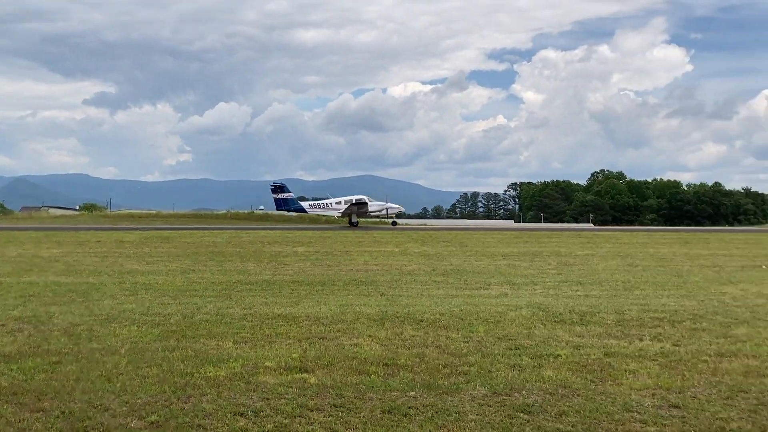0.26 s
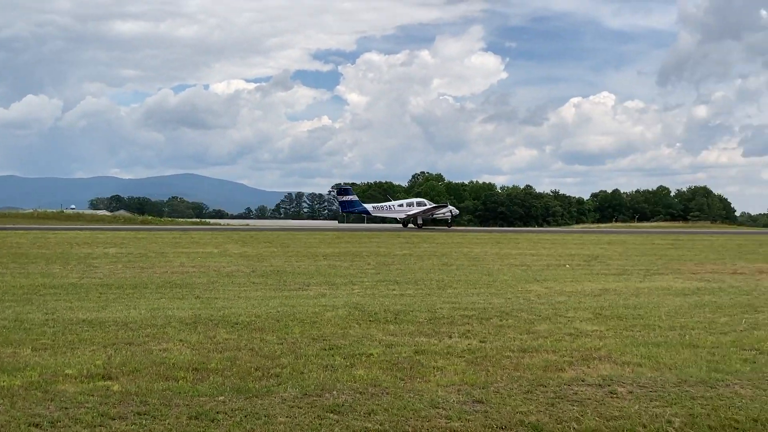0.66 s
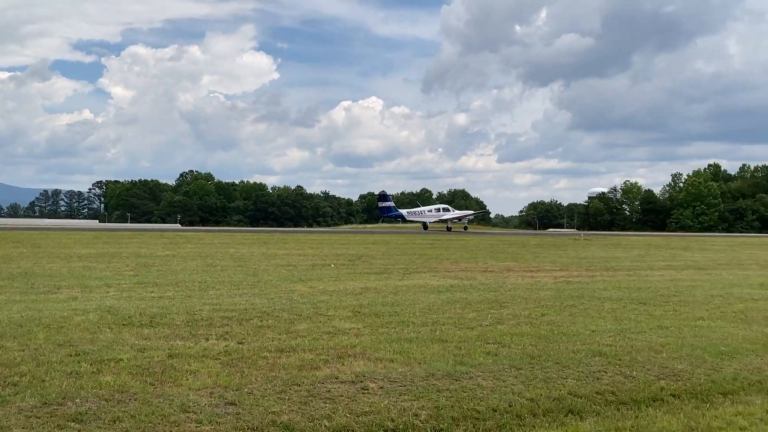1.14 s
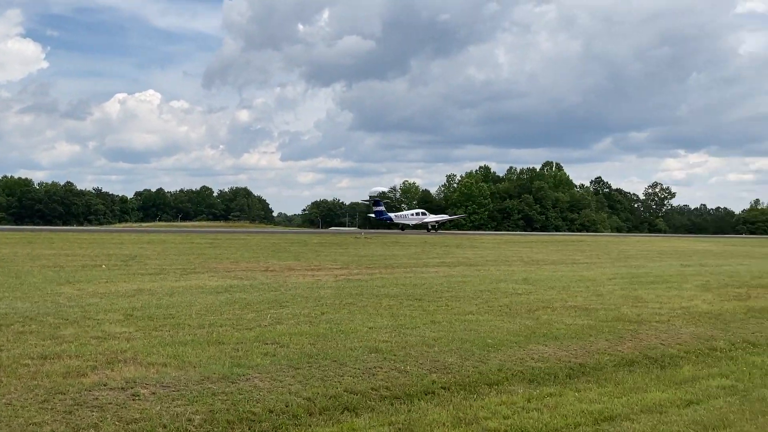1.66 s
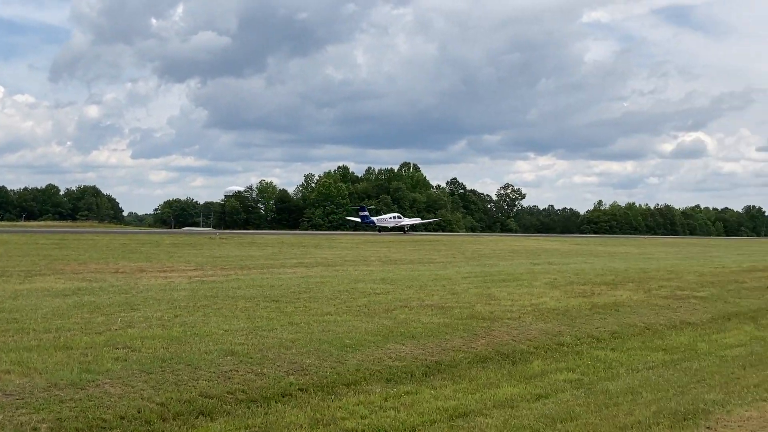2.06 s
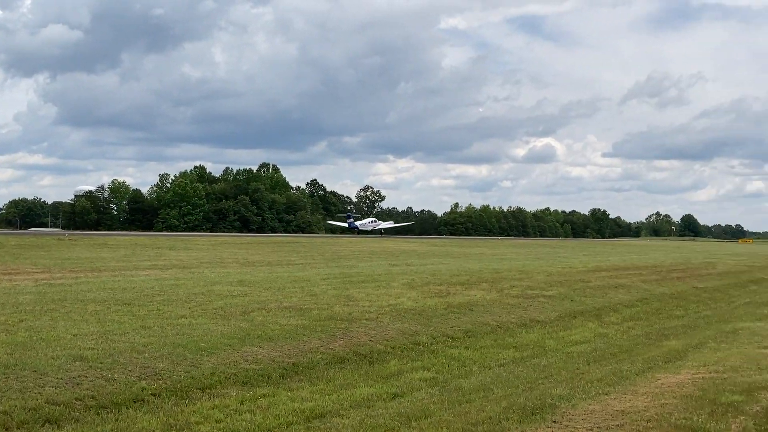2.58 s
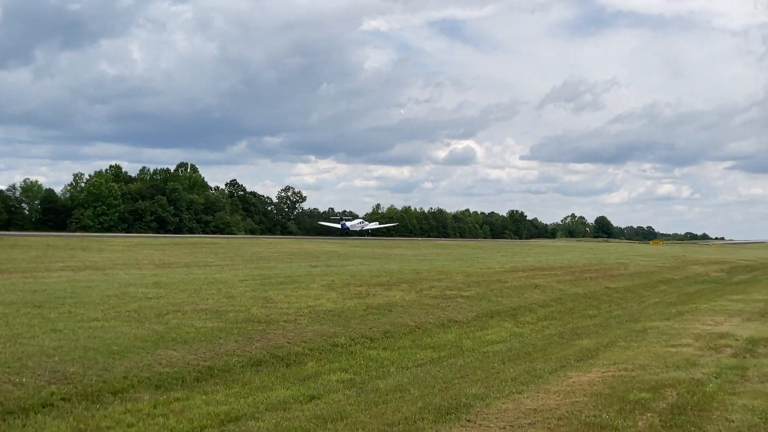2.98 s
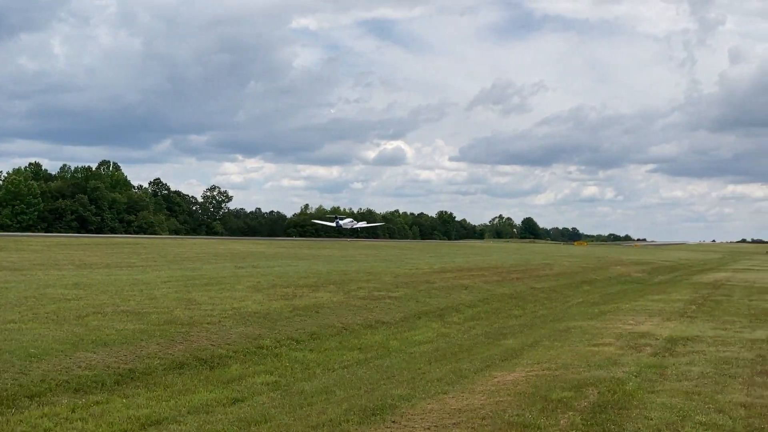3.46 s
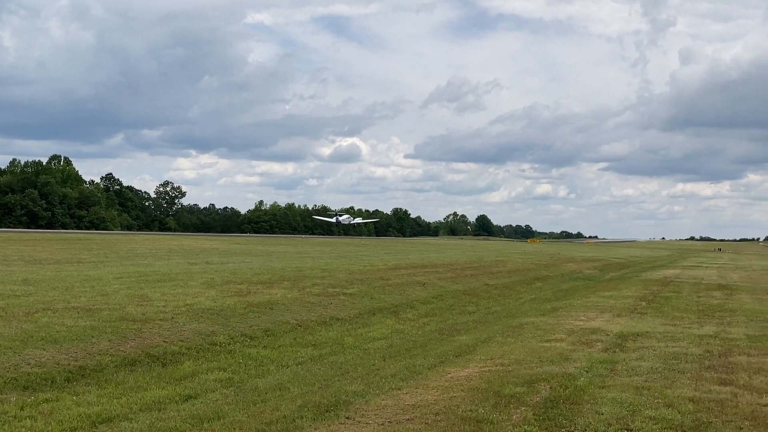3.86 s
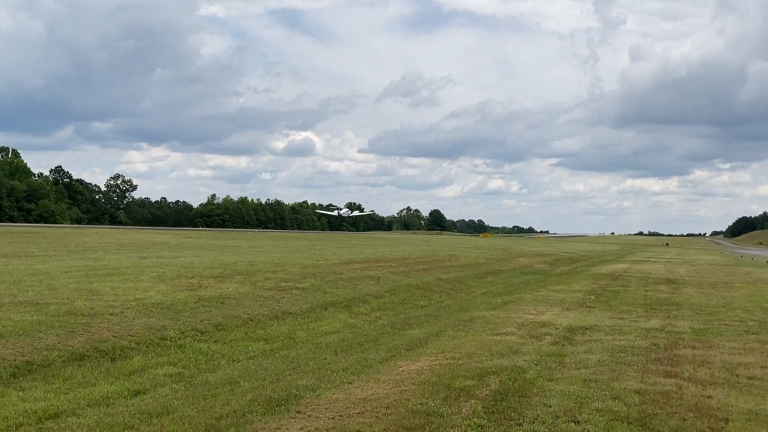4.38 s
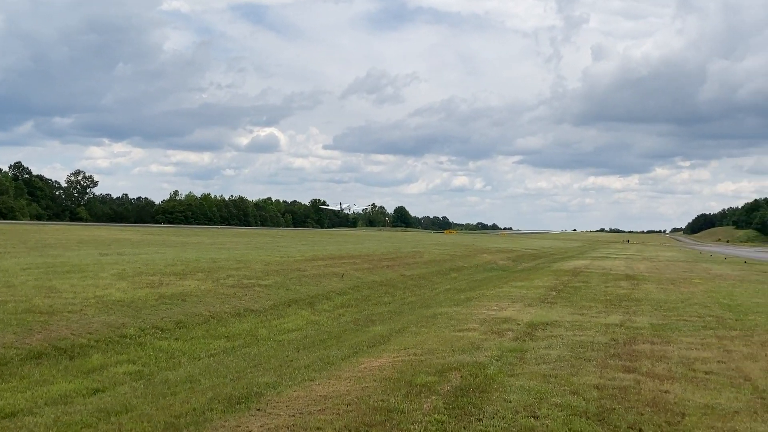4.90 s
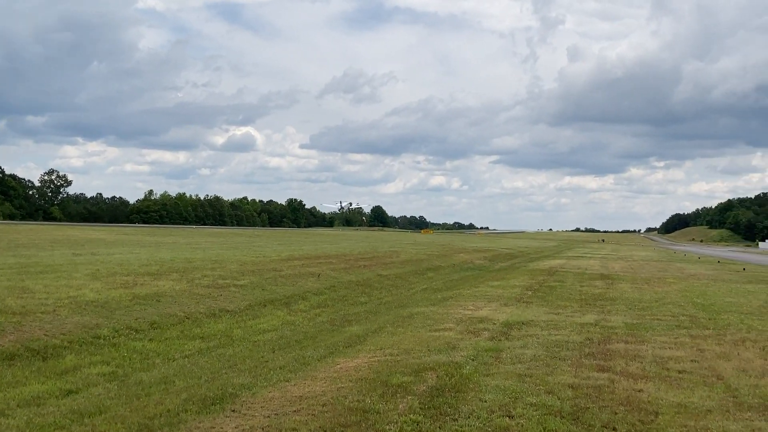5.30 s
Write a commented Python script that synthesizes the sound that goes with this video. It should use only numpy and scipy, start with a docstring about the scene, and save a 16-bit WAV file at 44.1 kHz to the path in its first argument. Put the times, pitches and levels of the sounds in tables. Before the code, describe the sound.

A twin-engine propeller plane roars past at full power, raspy and throbbing, then quickly fades to a distant low drone over open grass.

```python
"""Departure of a twin-engine propeller plane

At full power it passes along a runway, lifts off and recedes over open grass; its drone slides down in pitch.
The drone is a harmonic series on the blade rate, in which two propellers slip through each other.
Each exhaust firing gates a rasp of noise that the air dulls with distance, over a low turbulent rumble.
A faint outdoor wash and one soft swell lie behind, with two very short, faint pulses of high treble.
Two close microphone ports hear the sound with a phase lead.
"""
import sys
import numpy as np
from scipy import signal
from scipy.fft import rfft, irfft, next_fast_len
from scipy.io import wavfile
from scipy.ndimage import uniform_filter1d

SR = 44100
rng = np.random.default_rng(int(sys.argv[2]) if len(sys.argv) > 2 else 0)


def wav_record(signal):
    """Record a signal, one row per channel, as 16-bit PCM in the file named by sys.argv[1]."""
    frames = np.transpose(np.atleast_2d(signal))
    bounded = np.clip(frames, -1, 1)
    # unit amplitude maps onto the largest positive 16-bit level
    quanta = np.round(bounded * 32767).astype(np.int16)
    wavfile.write(sys.argv[1], SR, quanta)


N = 244314  # samples

# Microphone ports: hz, left_lead_rad, likeness_0_to_1, left_minus_right_db
PORTS = [(59.8, -0.7, 1, -1.5), (198.5, -1.13, 0.96, 2.5), (700, 1, 0.86, -0.5), (1030, 0.65, 1, 2.5),
         (1440, 0.47, 0.92, 1.5), (1845, 0.5, 1, 1.5), (2800, 0.93, 1, 3), (3050, 0.9, 0.92, -2),
         (3380, 1.67, 0.6, 1), (3820, 0.4, 0.77, -1), (4420, 1.08, 0.35, -0.5), (5540, 2.5, 0.7, -3.5),
         (6090, 1.5, 0.9, -1.5), (6710, 0.54, 1, -0.5)]
# Above that table the two channels turn half a cycle further apart each step, losing likeness between
STEP_HZ, STEP_BLUR = 2120, .12
EDGE_HZ = 15850  # upper band limit

# Outdoor wash colour: hz, density_db
WASH_COLOUR = [(200, -16), (330, -26), (600, 1.5), (1150, -4.5), (1800, -2.5), (2700, -6), (4330, -11),
               (7320, -16.5), (8500, -18), (12000, -58.5)]
WASH_DB, WASH_PATCHY_DB = -51, 2.1
# Extra level of the wash below 1 kHz: time_s, level_db
WASH_LOW_DB = [(0, 3), (2.5, 5), (3.2, 2.5), (3.7, -3), (4.12, 1.5), (4.3, 7.5), (4.45, 1.5), (4.8, 0),
               (5.54, -6)]
# Bumps and dips in the rasp and wash: centre_s, half_length_s, centre_hz, half_width_hz, change_db
DRIFTS = [(.4, 0.15, 2440, 148, 5), (0.902, 0.47, 1570, 130, -6), (1, 0.085, 3100, 150, 3.5),
          (1.101, 0.94, 2440, 201, 3), (1.205, 0.16, 3250, 800, 0.5), (.5, .5, 970, 70, -11),
          (1.298, 0.22, 3860, 149.6, 6), (1.897, 0.051, 1880, 180, 5), (2.052, .06, 1770, 180, 10),
          (2.105, 0.081, 1050, 100, 12), (2.205, 0.14, 2500, 350, -0.5), (2.498, 0.18, 1050, 100.1, 8.5),
          (2.55, 0.27, 700, 120, 4), (.5, .6, 400, 200, -1.5), (2.9, .3, 1150, 150, -2.5),
          (5.3, .3, 500, 200, 4.5), (3.298, 0.35, 550, 100, 3), (1.898, 0.069, 3500, 900, 5.5),
          (3.303, .35, 1150, 120, 4), (3.7, 0.31, 2700, 150, 3.5), (3.697, 0.23, 2050, 150.3, 2),
          (4.005, .3, 3540, 200, 8), (4.099, 0.24, 2320, 149.4, 6), (4.601, 0.18, 1250, 120, 8),
          (4.9, 0.37, 802.6, 150.2, -1.5), (5, .15, 2890, 110.2, -1), (5.2, 0.37, 2260, 251, -3.5),
          (5.402, 0.12, 1720, 149.8, 4.5)]
SWELL_S, SWELL_HALF_S, SWELL_HZ, SWELL_OCTAVES, SWELL_DB = 4.27, 0.63, 1050, 1, -50.5
# Damped pulses of high treble: start_s, level_db
TREBLE_PULSES = [(3.4229, -40), (3.816, -50)]

# Rumble colour: hz, density_db
RUMBLE_COLOUR = [(25, -1), (50, 8.5), (110, 11.5), (200, 14.5), (300, -2), (600, -9.5), (1000, -47.5)]
# Rumble level: time_s, level_db
RUMBLE_DB = [(0, -34), (.6, -41.5), (1.2, -38.5), (2, -45.5), (2.8, -42), (3.5, -44), (4.5, -44),
             (5.54, -51)]

# Uneven firings between the orders: blade_rate_multiple, peak_db, peak_s, loss_db_per_s away from the peak
BETWEEN = [(1.25, -50.5, 2.1, 1), (1.5, -49.5, 0.5, 2), (1.75, -45.5, 2, 4.5), (2.5, -45.5, 2, 9),
           (2.75, -49.5, 0.46, 10), (3.25, -54, 2.3, 9)]
WAVER_DB, WAVER_S = 1.5, 0.15

# Exhaust rasp, whose surges are louder and brighter: time_s, level_db, brightness_db
RASP = [(0, -19, -7), (.1, -20, -7), (.21, -19, -1.5), (.42, -22.5, 1.5), (.66, -19.5, 1.5), (.77, -22, -4),
        (.99, -19, -1.5), (1.15, -22, 2), (1.32, -24, -0.5), (1.48, -27, 6.5), (1.6, -27.5, 1),
        (1.75, -31.5, 5), (1.83, -34, 0), (1.9, -32.5, 4), (1.98, -33, 6.5), (2.03, -34.5, -0.5),
        (2.18, -39, -5), (2.25, -38, 4.5), (2.33, -38.5, 1), (2.84, -42.5, -3.5), (3.24, -51.5, -6),
        (4.3, -54, -3.5), (5.54, -55.5, 8)]
# Rasp colour: hz, density_db
RASP_COLOUR = [(200, -32), (330, -12), (500, -7.5), (750, -3.5), (880, -9.5), (970, -12), (1070, 3.5),
               (1150, 2.5), (1350, 1.5), (1600, -1.5), (1900, -0.5), (2250, -5), (2900, -1), (3500, -1),
               (5400, 0.5), (7500, 0), (9100, 1), (10100, -5), (16000, -22.5)]
# Rasp tone: time_s, growl_db (below 2.2 kHz), ring_db (near 1.85 kHz), throbbing_share_0_to_1
RASP_TONE = [(0, -8, -0.5, 0.59), (.3, -0.5, 3, 0.58), (.5, -1, 5.5, 0.41), (.75, -5.5, 1.5, 0.61),
             (1, -8.5, 1, 0.75), (1.3, -4, 4.5, 0.63), (1.5, -5, 7, 0.74), (1.8, -1.5, 1.5, 0.61),
             (1.93, -3, 3, 0.67), (2.05, -3, -1, 0.38), (2.3, -1, 1, 0.54), (2.7, -1.5, 1, 0.44),
             (3.2, -4.5, 1, 0.32), (4.4, -7.5, 0, 0.65), (5.2, -7.5, -9, 0.46), (5.54, 6, 4, 0.58)]
# Rasp bands: upper_edge_hz, throb_factor, part_in_hard_firings_0_to_1
RASP_BANDS = [(1520, 0.45, .2), (3500, 1.04, 0.8), (7200, 1.18, .9), (16500, 1.1, 1)]
CRACKLE_DB, TREBLE_DB, TREBLE_FOLLOWS = -7.5, -11, 0.36  # near 4 kHz; above 6 kHz; share of brightness
RASP_PATCHY_DB = .9
# Air loss at 12 kHz: time_s, loss_db
AIR_DB = [(0, -6), (1, -0.5), (2, 2.5), (3, 2), (4, 13), (5.54, 26)]
# Burst size of the four exhausts in turn, one of them louder: level_db
CYLINDERS_DB = [1.14, -2.3, -0.14, 0.077]
SIZE_SPREAD_DB = .7  # random spread of burst sizes
# Harder firings: time_s, gain_db before the band's part
HARD_FIRINGS = [(.161, 2), (.297, 5), (.399, 2), (.629, 2), (.674, 1.5), (.85, 2), (.908, 3.5), (.955, 4),
                (.979, 2), (1.003, 2), (1.05, 3), (1.097, 4.5), (1.228, 3), (1.432, 5), (1.882, 2),
                (1.906, 2), (1.955, 2), (1.98, 2), (2.005, 2), (2.856, 2.5)]
# Drift of the bursts against the blade passes as the path changes: time_s, delay_blade_passes
FIRING_DELAY = [(0, .1), (.45, .03), (.75, -.02), (1.05, -.06), (1.65, -.07), (1.95, -.03), (2.25, -.11),
                (2.65, -.22), (2.9, -.16), (3.25, .1), (4.25, .05), (4.75, .35), (5.54, .62)]
RISE, FALL, TAIL, TAIL_SHARE = .105, .125, .27, .45  # burst widths in blade passes; share of the tail
CRACK_DB, CRACK_ORDERS = -27, range(12, 60)  # each order against the rasp, before its colour

# Blade-passing rate as heard, lowered as the plane turns away: time_s, pitch_hz, overtone_left_lead_rad
PITCH = [(0, 89.76, 1.06), (.5, 86.98, 1.06), (1, 84.45, 1.04), (1.5, 82.9, 0.95), (2, 81.6, 0.6),
         (2.4, 80.7, -0.26), (3, 80.57, -0.44), (5.54, 79.47, -0.4)]
# First order, a beating pair: time_s, level_db, partner_gain_turns, partner_ratio
FIRST_ORDER = [(0.0, -11.0, -0.34, 0.13), (0.4, -19.3, 0.34, 0.54), (0.69, -19.2, 0.54, 0.85),
               (0.9, -23.0, 0.82, 0.0), (1.17, -17.3, 1.34, 0.29), (1.47, -18.0, 2.31, 0.24),
               (2.0, -19.1, 4.33, 0.1), (2.3, -17.7, 5.3, 0.14), (2.9, -20.4, 7.35, 0.0),
               (3.2, -23.7, 8.45, 0.17), (3.79, -31.9, 10.41, 1.0), (4.15, -24.4, 11.28, 0.41),
               (4.58, -23.1, 12.6, 0.16), (4.95, -32.0, 13.69, 0.39), (5.25, -30.5, 14.73, 0.12),
               (5.54, -31.3, 15.93, 0.67)]
# Second order, a beating pair: time_s, level_db, partner_gain_turns, partner_ratio
SECOND_ORDER = [(0.0, -20.2, 0.07, 0.36), (0.19, -21.0, 0.38, 0.76), (0.31, -18.5, 0.68, 0.3),
                (0.42, -16, 0.8, 0.1), (0.57, -15.7, 0.98, 0.07), (0.85, -18.6, 1.0, 0.0),
                (0.97, -20, 1.15, 0.05), (1.025, -23, 1.5, 0.55), (1.08, -26, 2, 0.3),
                (1.17, -28, 2.52, 0.6), (1.26, -28, 3.1, 0.05), (1.35, -24.5, 3.6, 0),
                (1.54, -20.7, 4.8, 0.0), (1.98, -26.1, 8.1, 0.18), (2.19, -35.5, 10.1, 0.45),
                (2.55, -27.9, 12.6, 0.0), (3.08, -32.3, 16.72, 0.15), (3.3, -37, 17.9, 0.2),
                (3.41, -36, 18.5, 0.35), (3.6, -34.5, 19.5, 0.25), (3.73, -34.9, 20.41, 0.71),
                (4.11, -34.7, 22.36, 0.88), (4.51, -36.2, 23.67, 0.64), (4.97, -42.5, 25.5, 0.86),
                (5.16, -38.7, 25.6, 0.16), (5.54, -36.4, 27.29, 0.01)]
# Slow phase drift of the two lowest orders against the blade passes: time_s, first_ahead_rad, second_ahead_rad
LOW_ORDER_PHASE = [(0, 0, -.3), (.18, -.2, -1), (.33, -.3, 2.5), (.45, -.2, 2.2), (.65, 1.6, 1.7),
                   (1.5, 1.6, -.95), (2.1, 1.25, -2.5), (2.6, .9, -5), (3.5, -.1, -8), (4.3, -.9, -10.5),
                   (4.8, -2.4, -12.5), (5.54, -3, -15.4)]
# Third order: time_s, level_db
THIRD_DB = [(0, -40.5), (.35, -34.5), (.62, -39.5), (.85, -35), (1.2, -38), (1.6, -43.5), (1.95, -45),
            (2.15, -61), (2.45, -45), (2.8, -58), (3.2, -48.5), (3.8, -55.5), (4.3, -48.5), (4.8, -60),
            (5.2, -56.5), (5.54, -62)]
# Higher orders: blade_rate_multiple, level_db, far_propeller_part_0_to_1
UPPER = [(4, -12, 0.53), (5, -8.5, 0.72), (6, -8.5, 1.0), (7, -5, 0.73), (8, -6.5, 0.7), (9, -14, 0.7),
         (10, -35.5, 0.4)]
# Propeller pair: time_s, higher_orders_db, far_strength_0_to_1, loss_db_per_order
PAIR = [(0, -30, 1, 0.5), (.1, -31, 1, -0.5), (.33, -27, 0.84, 1), (.5, -29.5, 0.94, 1.4),
        (.7, -30, 0.76, 1.5), (.95, -36, 0.8, 1), (1.15, -35.5, 0.1, 2.2), (1.6, -48.5, 0, 0),
        (2.4, -44, 0.11, 3), (3.2, -46, 0.19, 7), (4.3, -48, 0.75, 9), (5.54, -62, 0.29, 3)]
# Slip between the propellers: time_s, slip_blade_passes
SLIP = [(0, -.01), (.2, .19), (.41, .365), (.64, .5), (.95, .58), (1.15, .63), (1.6, .92), (2.4, 1.31),
        (3.2, 2.16), (4.3, 4.7), (5.54, 7.3)]
BLADE_DELAY, BLADE_LEAD = 0.2, 1.01  # higher orders align as one blade pulse: blade passes, turns


def amp(db):
    """Amplitude is ten to the power of decibels over twenty."""
    return 10 ** (np.asarray(db) / 20)


def evened(x):
    """Normalisation: division by the root mean square gives unit power."""
    return x / np.sqrt(np.mean(x ** 2) + 1e-20)


def in_time(rows, t):
    """Linear interpolation of a table's columns at times t."""
    s, *columns = np.transpose(rows)
    return [np.interp(t, s, c) for c in columns]


def in_pitch(rows, hz):
    """Interpolation of a spectrum table's columns on a logarithmic frequency axis."""
    f, *columns = np.transpose(rows)
    return [np.interp(np.log(hz + 1), np.log(f + 1), c) for c in columns]


def ports(hz):
    """Spaced reception: left phase lead, likeness and level balance depend on frequency."""
    lead, same, balance_db = in_pitch(PORTS, hz)
    turn = np.pi * np.maximum(hz - PORTS[-1][0], 0) / STEP_HZ
    return lead - turn + np.sin(2 * turn) / 2, same - STEP_BLUR * np.sin(turn) ** 2, balance_db


def drifts_db(hz, s):
    """Spectral modulation: Gaussian bumps and dips in time and frequency."""
    at, half_s, mid_hz, half_hz, db = np.transpose(DRIFTS)
    in_band = np.exp(-((hz - mid_hz) / half_hz) ** 2)
    in_moment = np.exp(-((s[:, None] - at) / half_s) ** 2)
    return (db * in_band) @ in_moment.T


def noise(shape_db, likeness, patchy_db, size=512, tall=8, wide=6):
    """Partly coherent noise: random spectra coloured by shape_db(hz, s), mottled by smoothed patches."""
    hop = size // 4
    frames, hz = N // hop + 5, np.fft.rfftfreq(size, 1 / SR)[:, None]
    a, b, c, d, patches = rng.standard_normal((frames, len(hz), 5)).T
    patches = uniform_filter1d(patches, size=tall, axis=0)  # across frequency bins
    patches = evened(uniform_filter1d(patches, size=wide, axis=1))  # across frames
    lead, same, balance_db = ports(hz)
    # the given likeness counts fully below 1.5 kHz and not at all above 3 kHz
    same = np.clip(same * np.interp(hz, [1500, 3000], [likeness, 1]), 0, 1)
    left = a + 1j * b
    right = same * left + np.sqrt(1 - same ** 2) * (c + 1j * d)
    z = np.array([left * amp(balance_db / 2), right * amp(-balance_db / 2) * np.exp(-1j * lead)])
    z *= amp(shape_db(hz, np.arange(frames) * hop / SR) + patchy_db * patches)
    return signal.istft(z, nperseg=size, noverlap=size - hop)[1][:, :N]


def wash():
    """Diffuse background: faint noise of slowly drifting colour, less alike in the two ports."""
    def colour(hz, s):
        low_db = in_time(WASH_LOW_DB, s)[0] / (1 + (hz / 1000) ** 4)
        return in_pitch(WASH_COLOUR, hz)[0] + drifts_db(hz, s) + low_db
    return amp(WASH_DB) * evened(noise(colour, likeness=0.66, patchy_db=WASH_PATCHY_DB, tall=7, wide=70))


def swell():
    """Opposed polarity spreads a soft rush wide as it rises and sinks once."""
    def colour(hz, s):
        return -6 * (np.log2((hz + 1) / SWELL_HZ) / SWELL_OCTAVES) ** 2
    t = np.arange(N) / SR
    rush = evened(noise(colour, likeness=0.99, patchy_db=3.5, tall=7, wide=30))
    rush = rush * np.array([[1], [-1]])
    return amp(SWELL_DB - 6.7 * ((t - SWELL_S) / SWELL_HALF_S) ** 4) * rush


def treble_pulses():
    """Exponential damping: a 14.5 kHz sine decays within about a millisecond."""
    out, t = np.zeros(N), np.arange(90) / SR
    for s, db in TREBLE_PULSES:
        pulse = np.sin(2 * np.pi * 14500 * t) * np.exp(-t / 0.00031)
        out[round(s * SR):][:len(t)] += amp(db) * pulse
    return out


def rumble():
    """Turbulence: low broadband noise fills the gaps between the orders."""
    def colour(hz, s):
        return in_pitch(RUMBLE_COLOUR, hz)[0]
    roar = evened(noise(colour, likeness=1.0, patchy_db=-1.5, size=2048))
    return amp(in_time(RUMBLE_DB, np.arange(N) / SR)[0]) * roar


def between_orders(turns):
    """Subharmonic unevenness: faint wavering tones at multiples of a quarter of the blade rate."""
    t, out = np.arange(N) / SR, 0
    chance = rng.standard_normal((len(BETWEEN), 40))
    for (k, peak_db, peak_s, loss_db), row in zip(BETWEEN, chance):
        waver = np.interp(t / WAVER_S, np.arange(len(row)), row)
        level_db = peak_db - loss_db * abs(t - peak_s) + WAVER_DB * waver
        out = out + amp(level_db) * np.cos(2 * np.pi * np.round(4 * k) / 4 * turns + row[-1])
    return np.sqrt(2) * out


def cracks(turns, hz):
    """Periodicity: the repeating part of each firing is a series of high orders with wandering phases."""
    t, side, out = np.arange(N) / SR, np.array([[.5], [-.5]]), 0
    (level_db, bright_db), growl_db = in_time(RASP, t), in_time(RASP_TONE, t)[0]
    crackle_db = CRACKLE_DB + bright_db
    knots = np.arange(0, t[-1] + 1, .12)  # s
    for k in CRACK_ORDERS:
        wander = np.interp(t, knots, 1.4 * rng.standard_normal(len(knots)))  # rad
        pitch_hz = k * hz.mean()
        lead, _, balance_db = ports(pitch_hz)
        tone_db = growl_db if pitch_hz < 1450 else crackle_db if pitch_hz > 3200 else 0
        db = in_pitch(RASP_COLOUR, pitch_hz)[0] + tone_db
        angle = 2 * np.pi * k * (turns - .38) + wander + lead * side
        out = out + amp(db + balance_db * side) * np.cos(angle)
    return amp(level_db + CRACK_DB) * out


def rasp_colour(hz, s):
    """Selective absorption: the ground echo and the air shift the colour as the plane recedes."""
    bright_db, (growl_db, ring_db, _) = in_time(RASP, s)[1], in_time(RASP_TONE, s)
    crackle_db, treble_db = CRACKLE_DB + bright_db, TREBLE_DB + TREBLE_FOLLOWS * bright_db
    octave = np.log2((hz + 1) / 2200)
    shift_db = growl_db * np.clip(-octave / 0.51, 0, 1)
    shift_db += crackle_db * np.clip(1 - abs(octave - .9) / 0.91, 0, 1)
    shift_db += treble_db * np.clip((octave - .9) / 0.73, 0, 1)
    shift_db += ring_db * np.exp(-((hz - 1850) / 260) ** 2)
    air_db = in_time(AIR_DB, s)[0] * (hz / 12000) ** 3
    return in_pitch(RASP_COLOUR, hz)[0] + shift_db + drifts_db(hz, s) - air_db


def exhaust(turns):
    """Amplitude modulation: noise bursts once a firing over a steady roar, sized anew in each band."""
    t = np.arange(N) / SR
    level_db, throb = in_time(RASP, t)[0], in_time(RASP_TONE, t)[-1]
    shifted = turns + 1.087
    firing, age = shifted.astype(int), shifted % 1
    after = age - .43  # blade passes from the burst's peak
    # a burst snaps up, falls and leaves a tail
    rise = np.exp(-.5 * (after / RISE) ** 2)
    fall = (1 - TAIL_SHARE) * np.exp(-.5 * (after / FALL) ** 2) + TAIL_SHARE * np.exp(-abs(after) / TAIL)
    shape = np.where(after < 0, rise, fall)
    chance = rng.standard_normal((firing.max() + 1, len(RASP_BANDS)))
    size_db, hard_db = np.take(CYLINDERS_DB, firing, mode="wrap"), 0
    for s, db in HARD_FIRINGS:
        hard_db = hard_db + db * (firing == firing[round(s * SR)])

    hiss = noise(rasp_colour, likeness=0.92, patchy_db=RASP_PATCHY_DB, tall=6, wide=14)
    hiss /= np.sqrt(uniform_filter1d((hiss ** 2).mean(0), size=8000))  # level the running power
    length = next_fast_len(N)
    spectrum, hz = rfft(hiss, length), np.fft.rfftfreq(length, 1 / SR)
    below, out = 0, 0
    for k, (edge_hz, fullness, hard) in enumerate(RASP_BANDS):
        under = 1 / (1 + (hz / edge_hz) ** 6)
        band = irfft(spectrum * (under - below), length)[:, :N]
        share = np.clip(throb * fullness, 0, 1)
        burst_db = size_db + hard * hard_db + SIZE_SPREAD_DB * chance[firing, k]
        bursts = evened(amp(burst_db) * shape)
        out = out + np.sqrt(1 - share + share * bursts ** 2) * band
        below = under
    return amp(level_db) * out


def beating(rows, angle):
    """Interference: a tone beats with a partner whose phase shifts slowly against it."""
    level_db, gained, partner = in_time(rows, np.arange(N) / SR)
    return amp(level_db) * (np.cos(angle) + np.clip(partner, 0, 1) * np.cos(angle + 2 * np.pi * gained))


def propellers(turns, lead):
    """Harmonic series of blade passage: two beating low orders, then orders of two slipping propellers."""
    t, side = np.arange(N) / SR, np.array([[.5], [-.5]])
    first, second = in_time(LOW_ORDER_PHASE, t)
    centre_gain = 1 / np.cos(lead / 2)  # keeps the sum of the ports level despite the lead
    out = beating(FIRST_ORDER, 2 * np.pi * turns + first - (0.084 + 0.053 * t) * side)
    out += beating(SECOND_ORDER, 4 * np.pi * turns + second + lead * side) * centre_gain

    (level_db, far, loss_db), slip = in_time(PAIR, t), in_time(SLIP, t)[0]
    third = 6 * np.pi * (turns - slip / 2) + 0.5 + 1.13 * lead * side
    far_third = 0.8 * np.exp(-t / 2.0) * far * np.cos(third + 6 * np.pi * slip)
    out += amp(in_time(THIRD_DB, t)[0]) * (np.cos(third) + far_third) * centre_gain

    for k, db, part in UPPER:
        passes = turns + np.minimum(slip, .38) / 2 - BLADE_DELAY
        near_angle = 2 * np.pi * (k * passes + BLADE_LEAD) + 0.35 * side
        far_tone = part * far * np.cos(near_angle - 2 * np.pi * k * slip)
        order_db = level_db + db - loss_db * (k - UPPER[0][0])
        out += amp(order_db) * (np.cos(near_angle) + far_tone)
    return np.sqrt(2) * out


def scene():
    """Superposition: wash, swell, pulses and rumble add to exhaust and propellers on one blade phase."""
    t = np.arange(N) / SR
    hz, lead = in_time(PITCH, t)
    turns = np.cumsum(hz) / SR  # blade passes so far
    firings = turns - in_time(FIRING_DELAY, t)[0]
    background = wash() + swell() + treble_pulses() + rumble()
    engines = between_orders(turns) + cracks(firings, hz) + exhaust(firings) + propellers(turns, lead)
    return background + engines


def record(dry):
    """Band limitation: a linear-phase low-pass filter removes the highest treble."""
    lowpass = signal.firwin(511, EDGE_HZ, window=("kaiser", 9), fs=SR)
    return signal.oaconvolve(dry, lowpass[None], "same")


dry = scene()
out = record(dry)
wav_record(out)
```